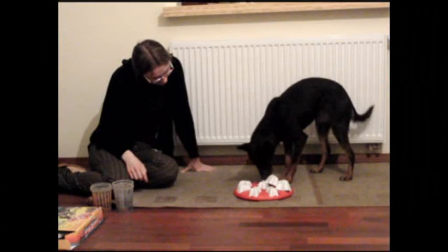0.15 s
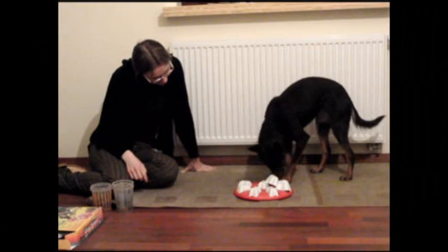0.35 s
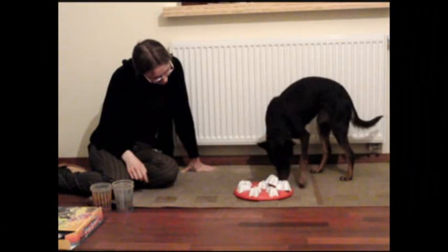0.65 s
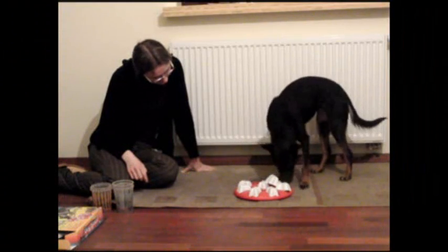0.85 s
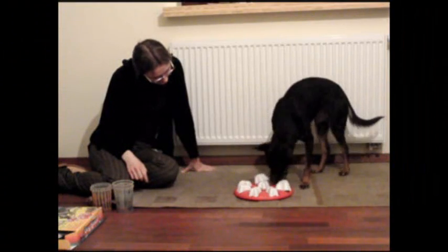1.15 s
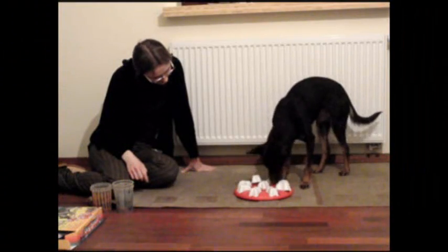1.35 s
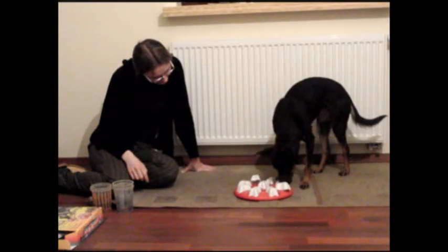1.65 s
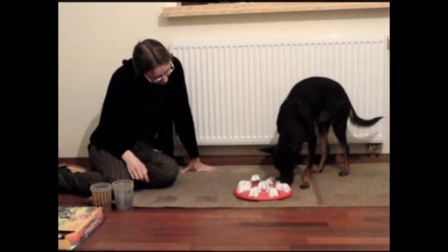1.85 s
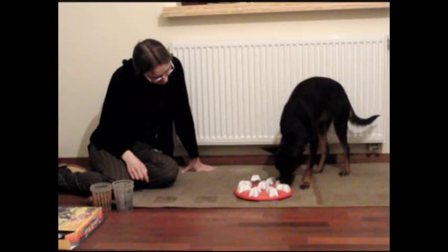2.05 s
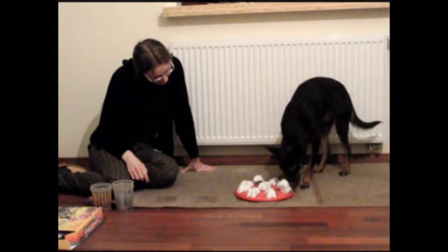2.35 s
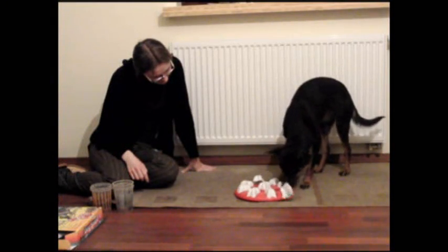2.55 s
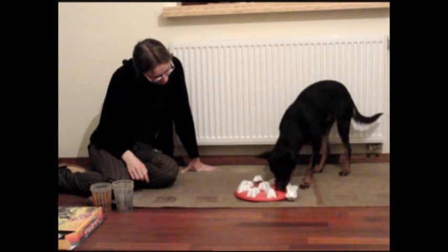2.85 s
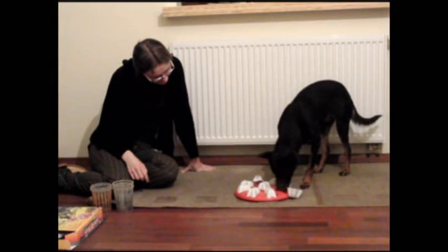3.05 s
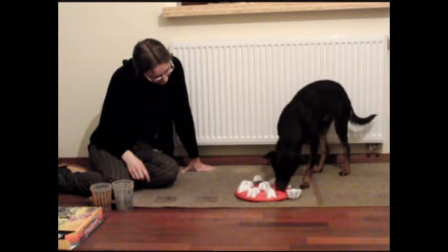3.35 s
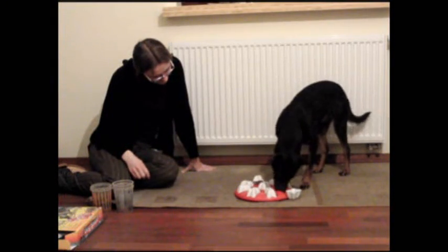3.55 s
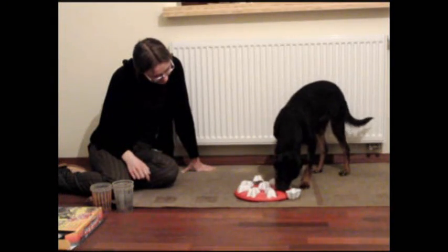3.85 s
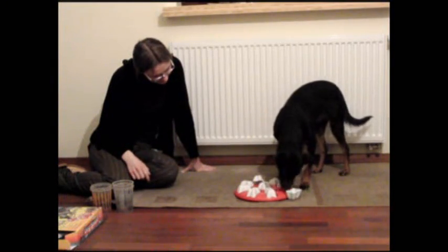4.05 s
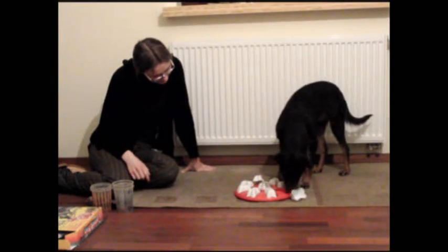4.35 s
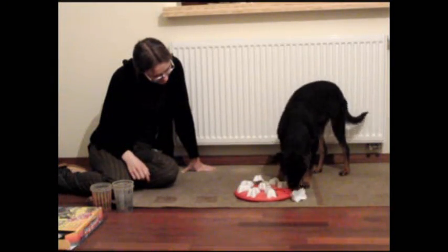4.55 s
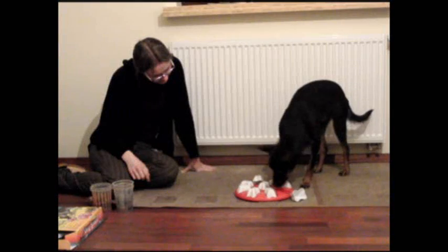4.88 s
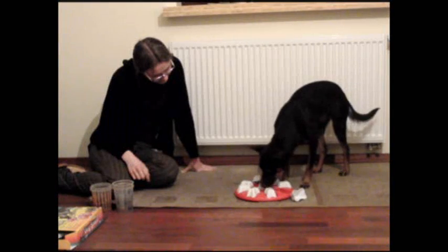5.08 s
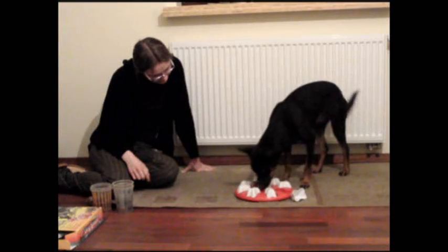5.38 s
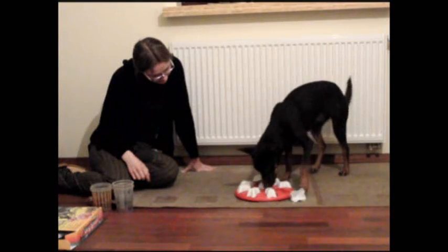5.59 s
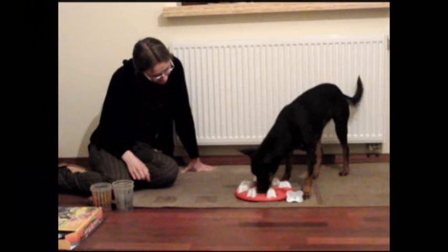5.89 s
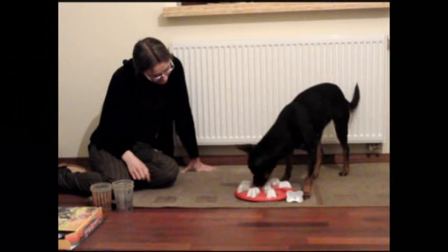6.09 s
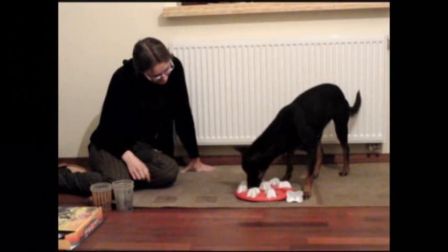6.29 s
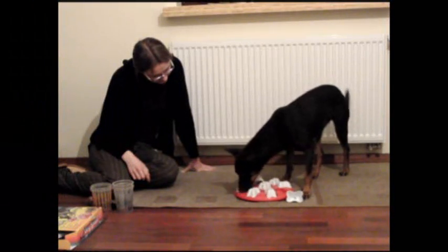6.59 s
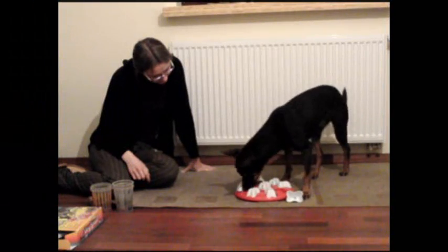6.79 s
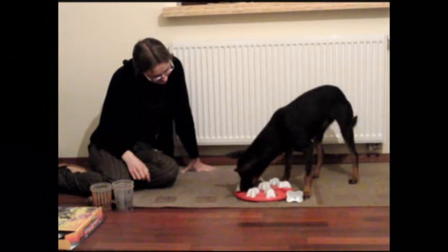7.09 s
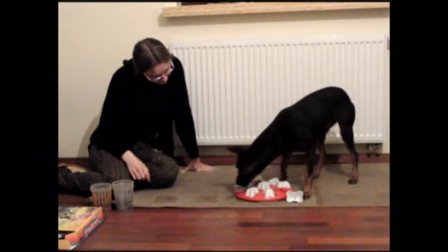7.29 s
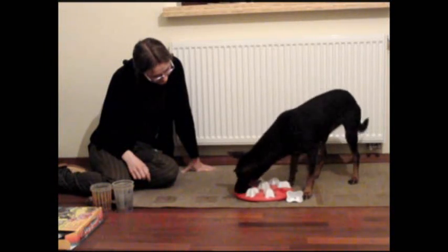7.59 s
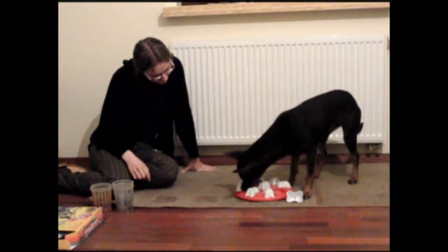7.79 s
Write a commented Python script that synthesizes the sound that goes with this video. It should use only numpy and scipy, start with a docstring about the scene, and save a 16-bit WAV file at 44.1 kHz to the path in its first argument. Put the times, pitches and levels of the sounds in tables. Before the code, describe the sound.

A dog noses a plastic puzzle toy indoors, hollow lids clacking and scraping in irregular bursts, then quick sniffs, a tooth tap and a snort.

```python
"""Hollow plastic lids knock and slide on their base, as a dog noses a puzzle toy in a bare, hard-floored room.
Knocks and slides set off short rings in the plastic. Quick sniffs and two long snorts are shaped noise.
One sharp tap of a tooth rings a thin lid edge, and paws thud softly on the boards as fading low tones.
Noise-like echoes make the room ring on after the toy, tooth and nose; a small microphone adds a steady hiss."""
import sys
import numpy as np
from scipy import signal
from scipy.fft import rfft, irfft
from scipy.io import wavfile

SR = 44100
rng = np.random.default_rng(int(sys.argv[2]) if len(sys.argv) > 2 else 0)


def gain_from_db(level_db):
    """Turn a decibel level (scalar or array-like) into a linear amplitude factor."""
    decades = np.asarray(level_db, float) / 20
    return 10 ** decades


def generate_wav(signal):
    """Clip the signal to [-1, 1] and save it as 16-bit WAV at the path in sys.argv[1]."""
    frames = np.transpose(np.atleast_2d(signal))
    scaled = np.clip(frames, -1, 1) * 32767
    pcm = np.round(scaled).astype(np.int16)
    wavfile.write(sys.argv[1], SR, pcm)


N = 349706   # length in samples

# Levels in these tables set balances; the functions below add their own gains.
# microphone hiss, colour of the noise: (f/Hz, level/dB)
MIC_HISS = [(12, -18), (20, 4), (79, 1), (337, -1), (410, -3.5), (759, -5), (1260, -10.5), (1570, -8.5),
            (2600, -13.5), (3530, -12.5), (3950, -17), (6720, -19), (16000, -27.5)]
# paws on the boards: (t/s, level/dB, f/Hz, overtone relative to the main tone/dB)
PAW_THUMPS = [(0.03, -40.5, 105.4, -1), (0.869, -50, 94, -6), (0.999, -58, 101, -8),
              (1.221, -44.5, 74, -20), (1.329, -49, 81, -4), (3.075, -44.5, 125.5, 3), (6.498, -56, 57, -6),
              (7.652, -42, 80.5, -8)]
# how long the room rings in each part of the spectrum: (f/Hz, time to fall 60 dB/s)
ROOM_DECAY = [(300, 0.42), (800, 0.44), (2000, 0.4), (5500, 0.42), (12000, 0.17)]
# colour of the air noise from the nose: (f/Hz, level per Hz/dB)
AIR_COLOUR = [(530, -24), (900, -8.5), (1000, -5.5), (1100, -5.5), (2020, 1.5), (2170, -2), (2470, -1.5),
              (6890, -21), (7860, -22.5), (10600, -24.5), (16000, -38)]
# resonances of the nostrils: (f/Hz, width/Hz, level/dB)
NOSTRIL_RESONANCES = [(2083, 166, -12.5), (2460, 83, -15), (3567, 520, -1.5), (6760, 210, -13)]
# quick sniffs: (peak t/s, breath level/dB, nostril-edge hiss relative to breath/dB, hold/s)
QUICK_SNIFFS = [(0.507, -60, -15, 0.0087), (0.655, -58.5, -11, .01), (0.734, -65, -4, 0.015),
                (1.173, -71.5, 4, .01), (3.033, -66, -4, .01), (3.155, -60, -10, 0.0085),
                (3.434, -60, -15, .01), (3.56, -59, -21, 0.023), (3.7, -63, -14, 0.017),
                (3.845, -65, -22, 0.023), (4.206, -61.5, -26, 0.018), (4.276, -66, -15, .01),
                (4.696, -62.5, -11, 0.015), (4.859, -57.5, -21, 0.011), (5.055, -66.5, -5, .02),
                (5.114, -62, -18, 0.0092), (5.235, -54.5, -14, 0.0084), (5.39, -59.5, -8, .01),
                (5.434, -66, -6, 0.0091), (5.51, -63.5, -3, 0.0084), (5.657, -62, -8, .01),
                (5.796, -62, -9, 0.018), (5.94, -61, -6, .04), (6.224, -57, -11, 0.01),
                (6.362, -61.5, -7, 0.027), (6.502, -56.5, -15.5, 0.019), (6.64, -61, -11, .01),
                (6.775, -62.5, -12, .02), (6.93, -60.5, -7, 0.0076), (7.043, -59.5, -15, .01),
                (7.1, -63.5, -3, .01), (7.233, -58.5, -8.5, .01)]
# two long snorts, each a list of points: (t/s, breath level/dB, nostril-edge hiss level/dB)
LONG_SNORTS = [
    [(4.36, -74, -75), (4.404, -54.5, -71), (4.504, -45.5, -57.5), (4.542, -47.5, -60), (4.64, -94, -93)],
    [(7.64, -68, -80), (7.678, -69, -63), (7.728, -49, -49.5), (7.836, -39.5, -53.5), (7.9, -51, -62),
     (7.93, -53, -48)],
]
# tooth on a lid edge: (t/s, level/dB)
TOOTH_TAPS = [(5.9999, -13.5)]
# ringing of the thin lid edge: (f/Hz, level/dB, time to fall 60 dB/s)
EDGE_MODES = [(1570, -2, 0.014), (1810, -2, 0.0099), (2000, -2, 0.013), (2460, -6.5, 0.0092),
              (3060, -8.5, 0.0076), (3680, -8, 0.0063), (4690, -6, 0.007), (5540, -8.5, .004),
              (6150, -9.5, 0.0041), (7440, -15.5, 0.0051), (9000, -7.5, 0.0028), (11200, -6, 0.0013),
              (14100, -10.5, 0.0012)]
# lid on base: (t/s, blow level/dB, boom/dB, cup/dB, click/dB), the last three relative to the blow
LID_KNOCKS = [(0.012, -32, -11, 2, -13), (0.039, -23.5, 6, -6, -5.5), (0.052, -30.5, -10, 8, 6),
              (0.072, -14, -4, -2.5, 0), (0.119, -31, 4, 3, 4), (0.14, -18, -3, 1, 2),
              (0.221, -19, -5.5, -9.5, -20), (0.319, -28, -4, -7.5, -7), (0.576, -42, -3, -14, -19),
              (0.874, -41.5, -1, -3, 1), (1.001, -21, -13.5, -10, -6), (1.283, -35.5, -9.5, -9, -3.5),
              (1.351, -31.5, 0, -11, -8), (1.395, -20, -8.5, -1, -7.5), (1.43, -32, 5, 5, -2),
              (1.461, -30.5, 3, 2.5, -3), (1.485, -20.5, -6, -4, -6), (1.509, -34.5, 2, 4, 1),
              (1.588, -22.5, 2, -5.5, -6.5), (1.662, -18.5, -7, 0, -10), (1.714, -27, -10, -2.5, -4),
              (1.761, -27, -4, -6, -11), (1.838, -30.5, -1, -4, -8.5), (2.026, -39.5, -2.5, -8, -6.5),
              (2.079, -42.5, -13, -12, -3), (2.215, -42, -21.5, 5, -1), (2.222, -28.5, -4, -1, 1.5),
              (2.237, -9.5, -15.5, -11.5, -2.5), (2.382, -19, -11.5, -9.5, -1),
              (2.501, -26.5, -5.5, -4.5, -4), (2.664, -27.5, -8, -10, -9), (2.707, -25, -2.5, -6, -5.5),
              (2.729, -14.5, -17.5, -2, -2.5), (2.812, -27.5, -18, -3, 2.5), (2.909, -23.5, -5, -9.5, -7),
              (3.257, -21.5, -6, -4, -7), (3.371, -47, 3, -2, -2), (3.487, -43, -7, -11, -26),
              (3.669, -47, -6, -10, -19), (3.799, -52, -4, -15, -20), (5.435, -53, 5, -24, 2),
              (5.668, -37.5, -2.5, -8, -7), (5.677, -40, -2, -5, -21), (5.797, -45.5, -15, -24, -10),
              (5.907, -40, -6.5, -36, -11), (6.076, -49, 4, -9, 2), (6.596, -44, -4, -13, -0.5),
              (6.713, -36.5, -11, -16, -23), (6.772, -46, -7, -20, -10), (6.814, -43.5, 3.5, -5.5, -5),
              (7.058, -37, -6.5, -10, -3.5), (7.163, -42.5, -11, -10.5, -12),
              (7.241, -36.5, -11, -18.5, -10), (7.363, -17.5, -2, -6, -8), (7.639, -22.5, -10.5, -10, -7),
              (7.781, -26.5, -3, -25, -20), (7.905, -22, -0.5, -0.5, 2.5)]
# a lid dragged over the base: (start t/s, length/s, first level/dB, last level/dB)
LID_SLIDES = [(0.0, 0.031, -11, -41), (0.088, 0.23, -49, -35), (1.346, 0.04, -37, -26.5),
              (1.398, 0.23, -35.5, -42.5), (1.61, 0.1, -34, -43), (2.647, 0.0944, -41.5, -28.5),
              (2.754, 0.17, -40.5, -34.5), (5.886, 0.019, -50, -53), (7.32, 0.013, -57, -39)]
# ringing of lid and base, in five parts from low to high: (f/Hz, level/dB, time to fall 60 dB/s)
BOOM_MODES = [(318, -19.5, 0.02), (499.7, -3.5, 0.055), (568, -1, 0.03), (611, -3, 0.053)]
BODY_MODES = [(750, 5, 0.0072), (980, 0, 0.012), (1049, -3, 0.026), (1170, -1, 0.01)]
CUP_MODES = [(1430, 3, .014), (1548, 7.5, 0.014), (1782, 0, 0.013), (1944, 1.5, 0.012), (2380, 1, 0.0051)]
CLICK_MODES = [(2534, -13.5, 0.0085), (2920, -3.5, 0.0092), (3353, 6, 0.003), (4300, 7, 0.0016),
               (4390, -14.5, 0.0061), (5210, -8.5, 0.0018)]
TICK_MODES = [(6050, 3.5, 0.0031), (6980, 5.5, 0.0033), (8730, 2, 0.00355), (10430, 3.5, 0.0015),
              (12000, 1, 0.0017), (14260, -1, 0.0012)]


def rms_one(x):
    """Scale a sound to an rms (average strength) of 1."""
    return x / np.sqrt(np.mean(x ** 2) + 1e-20)


def at_hz(points, hz):
    """Read a table's second column at any frequency, on a log-frequency axis."""
    table_hz, values = np.array(points)[:, 0], np.array(points)[:, 1]
    return np.interp(np.log(hz + 1), np.log(table_hz), values)


def steep_filter(x, order, hz, side):
    """Keep only the low, high or band side of the given frequency limits."""
    return signal.sosfilt(signal.butter(order, hz, side, fs=SR, output="sos"), x)


def envelope(strokes, fade_s, column=1):
    """Gain over time: each stroke follows its dB points, with a short fade before and after."""
    t, gain = np.arange(N) / SR, np.zeros(N)
    for points in strokes:
        times, db = np.transpose(points)[[0, column]]
        fade = np.clip(1 + np.minimum(t - times[0], times[-1] - t) / fade_s, 0, 1)
        gain = np.maximum(gain, gain_from_db(np.interp(t, times, db)) * fade)
    return gain


def coloured_noise(spectrum):
    """Steady noise with the given spectrum, rms 1."""
    hz = np.arange(N // 2 + 1) * SR / N
    white = rfft(rng.standard_normal(N))
    return rms_one(irfft(white * gain_from_db(at_hz(spectrum, hz)), N))


def ring(clicks, hz, t60):
    """Each click starts a sine that dies away by 60 dB in t60 seconds; a unit click gives height 1."""
    decay = gain_from_db(-60 / (t60 * SR))   # per sample
    turn = 2 * np.pi * hz / SR
    # the tiny offset keeps the filter from slowing down in silence
    return signal.lfilter([0, np.sin(turn)], [1, -2 * decay * np.cos(turn), decay ** 2], clicks + 1e-18)


def microphone_hiss():
    """A small microphone's own steady noise."""
    return gain_from_db(-59.5) * coloured_noise(MIC_HISS)


def paws(t60, onset_per_s):
    """A padded step makes the floor boards boom briefly: two low sines with a soft start."""
    out = np.zeros(N)
    for start_s, db, hz, overtone_db in PAW_THUMPS:
        start = int(start_s * SR)
        t = np.arange(min(SR // 2, N - start)) / SR
        main_tone = np.sin(2 * np.pi * hz * t)
        overtone = gain_from_db(overtone_db) * np.sin(2 * np.pi * 1.8 * hz * t)
        soft_start = 1 - np.exp(-t * onset_per_s)
        out[start:start + len(t)] += gain_from_db(db - 60 * t / t60) * soft_start * (main_tone + overtone)
    return out


def reflections():
    """Reflections off the room thicken over the first moments, then die away band by band."""
    first_echoes_per_s, build_s = 2500, 0.0024
    early_db, early_s = 2.5, 0.047   # near walls lift the first reflections
    lowest_hz = 180
    t = np.arange(SR * 3 // 4) / SR
    # echoes crowd together with the square of time, until every sample holds one
    density = np.clip(first_echoes_per_s * (1 + (t / 0.02) ** 2) / SR, 0, 1)
    present = rng.random(len(t)) < density
    echoes = rfft(rng.standard_normal(len(t)) * present / np.sqrt(density))
    half_octave = 2 * np.log2(np.arange(1, len(echoes) + 1) * SR / len(t) / lowest_hz)
    tail = 0
    for k in range(14):   # overlapping half-octave bands
        hz = lowest_hz * 2 ** (k / 2)
        t60 = at_hz(ROOM_DECAY, hz)
        share = np.clip(1 - np.abs(half_octave - k), 0, 1)
        band = irfft(echoes * share, len(t)) * gain_from_db(-60 * t / t60)
        # energy follows decay time and bandwidth
        tail = tail + band * np.sqrt(t60 * hz / SR / np.sum(band ** 2))
    build_up = 1 - np.exp(-t / build_s)
    return tail * build_up * gain_from_db(early_db * np.exp(-t / early_s))


def room(x, direct_db, room_db, shift_s, count=5):
    """Each place on the toy has its own reflections; the sound glides round these places in turn."""
    place = np.arange(N) / (shift_s * SR) % count
    out = gain_from_db(direct_db) * x
    for k in range(count):
        distance = np.abs((place - k + count / 2) % count - count / 2)
        share = np.cos(np.pi / 2 * np.minimum(distance, 1))
        out = out + gain_from_db(room_db) * signal.fftconvolve(x * share, reflections())[:N]
    return out


def sniffs():
    """Gains of breath and hiss: each sniff rises steeply, holds a moment and falls more slowly."""
    rise_db_per_s, fall_db_per_s = 900, 362
    t = np.arange(N) / SR
    breath_db, hiss_db = np.full(N, -150.0), np.full(N, -150.0)
    for peak_s, level_db, hiss_relative_db, hold_s in QUICK_SNIFFS:
        rise = rise_db_per_s * np.maximum(peak_s - t, 0)
        fall = fall_db_per_s * np.maximum(t - peak_s - hold_s, 0)
        shape_db = level_db - rise - fall
        breath_db = np.maximum(breath_db, shape_db)
        hiss_db = np.maximum(hiss_db, shape_db + hiss_relative_db)
    return gain_from_db(breath_db), gain_from_db(hiss_db)


def nose(breath_db, hiss_db, flutter_db):
    """Turbulent air: broad noise with nostril resonances, a hissing edge on top and a fast flutter."""
    hiss_from_hz = 6140   # above this the nostril edge hisses
    air = coloured_noise(AIR_COLOUR)
    for hz, width_hz, db in NOSTRIL_RESONANCES:
        air = air + gain_from_db(db) * signal.lfilter(*signal.iirpeak(hz, hz / width_hz, SR), air)
    breath = rms_one(steep_filter(air, 4, hiss_from_hz, "low"))
    hiss = rms_one(steep_filter(air, 4, hiss_from_hz, "high"))
    sniff_breath, sniff_hiss = sniffs()
    breath = gain_from_db(breath_db) * (sniff_breath + envelope(LONG_SNORTS, fade_s=0.03)) * breath
    hiss = gain_from_db(hiss_db) * (sniff_hiss + envelope(LONG_SNORTS, fade_s=0.019, column=2)) * hiss
    # smoothed noise moves the loudness up and down
    flutter = rms_one(signal.lfilter([1], [1, -1.99, 0.990025], rng.standard_normal(N)))
    return gain_from_db(flutter_db * flutter) * (breath + hiss)


def tooth(level_db, thin_hz):
    """A hard, small contact rings only the bright modes of a thin edge; the bass is cut below thin_hz."""
    clicks = np.zeros(N)
    for s, db in TOOTH_TAPS:
        clicks[int(s * SR)] = gain_from_db(db + level_db)
    out = np.zeros(N)
    for k, (hz, db, t60) in enumerate(EDGE_MODES):
        out += gain_from_db(db) * (-1) ** k * ring(clicks, hz, t60)
    return steep_filter(out, 4, thin_hz, "high")


def slide_slips(slide_db, slips_per_s):
    """A dragged lid catches and slips: dense random clicks of uneven size, shaped by the slides."""
    drags = [[(s, first_db), (s + length, last_db)] for s, length, first_db, last_db in LID_SLIDES]
    sizes = gain_from_db(6.24 * np.minimum(rng.exponential(1, N), 4)) * rng.choice([-1, 1], N)
    slipping = rng.random(N) < slips_per_s / SR
    return gain_from_db(slide_db) * envelope(drags, fade_s=0.003) * sizes * slipping


def toy(spread_db, chatter_db, chatter_s, give, skirt, slide_db, slips_per_s, slide_parts_db):
    """Knocks and slips strike the same five groups of plastic modes, each with its own strength."""
    knocks = np.array(LID_KNOCKS)
    boom, cup, click = knocks[:, 2:].T
    tick = click - 14   # a harder blow lifts the click and the tick above it
    # the rim does not land flat: three touches, on average ever lighter, follow each blow
    gaps = chatter_s * rng.uniform(0.3, 1.7, (len(knocks), 3))
    delays = np.c_[np.zeros(len(knocks)), np.cumsum(gaps, axis=1)]
    at = ((knocks[:, :1] + delays) * SR).astype(int).clip(0, N - 1)
    slips = slide_slips(slide_db, slips_per_s)
    groups = (BOOM_MODES, BODY_MODES, CUP_MODES, CLICK_MODES, TICK_MODES)
    out = np.zeros(N)
    for modes, part_db, drag_db in zip(groups, (boom, 0, cup, click, tick), slide_parts_db):
        blow_db = (knocks[:, 1] + part_db)[:, None]
        part = np.zeros(N)
        for k, (hz, db, t60) in enumerate(modes):
            touch_db = chatter_db * np.arange(4) + spread_db * rng.standard_normal(at.shape)
            hits = gain_from_db(drag_db) * slips
            np.add.at(hits, at, gain_from_db(blow_db + touch_db) * rng.choice([-1, 1], at.shape))
            part += gain_from_db(db - 4.5) * (-1) ** k * ring(hits, hz, t60)
        # plastic gives under the blow, so each part sounds only around its own modes
        low_hz, high_hz = modes[0][0] / skirt, min(give * modes[-1][0], 0.45 * SR)
        out += steep_filter(part, 3, [low_hz, high_hz], "band")
    return out


def scene():
    """Toy, tooth and nose share the room; small things radiate little bass, steps come through the floor."""
    lids = toy(spread_db=2.5, chatter_db=-8.0, chatter_s=0.0025, give=1.65, skirt=1.504,
               slide_db=-25.5, slips_per_s=700, slide_parts_db=(2, 4.5, 2.5, 0.5, -15.0))
    tap = tooth(level_db=-7.5, thin_hz=1280)
    breathing = nose(breath_db=-6, hiss_db=-5.0, flutter_db=2.5)
    # the nose and the lids change place about every shift_s
    air = room(lids + tap + breathing, direct_db=1, room_db=7, shift_s=0.13)
    air = steep_filter(air, 4, 341, "high")
    return (air + paws(t60=0.17, onset_per_s=60))[None]


def roll_off(x):
    """The treble ends steeply here."""
    return signal.sosfilt(signal.butter(12, 16500, fs=SR, output="sos"), x)


def record(dry):
    """The small microphone adds hiss and has a narrow dip in the treble."""
    dip_hz, dip_width_hz, dip_depth = 7954, 280, 0.82   # depth: share taken away at the centre
    heard = dry + microphone_hiss()
    narrow_band = signal.lfilter(*signal.iirpeak(dip_hz, dip_hz / dip_width_hz, SR), heard)
    mix = heard - dip_depth * narrow_band
    return roll_off(mix)


dry = scene()
out = record(dry)
generate_wav(out)
```